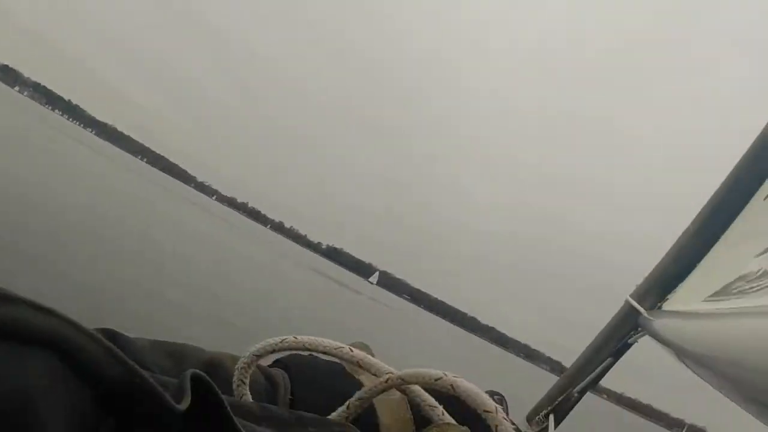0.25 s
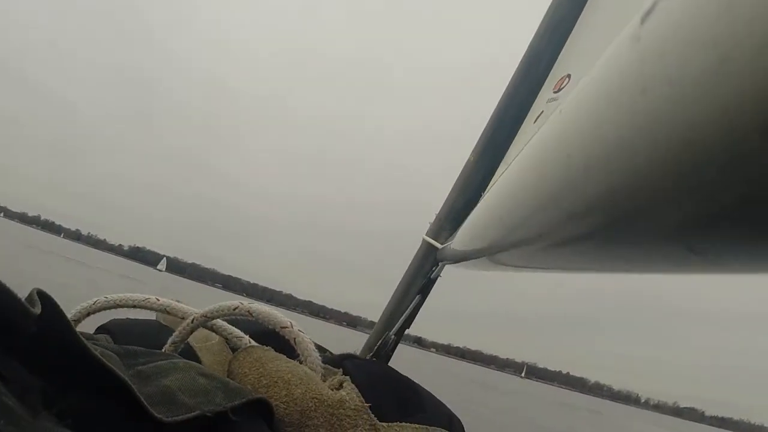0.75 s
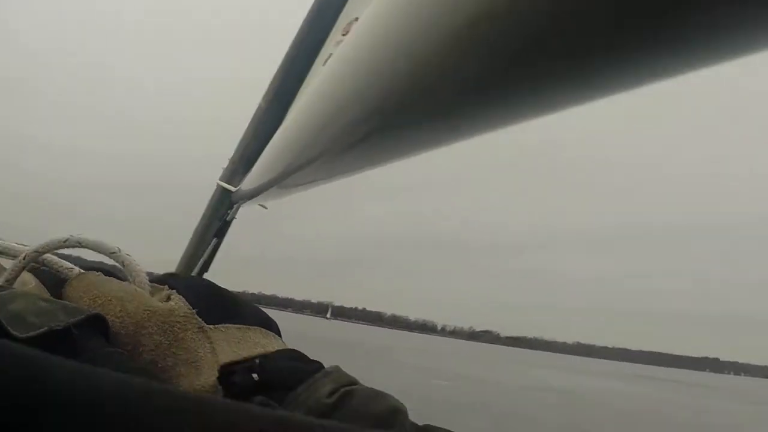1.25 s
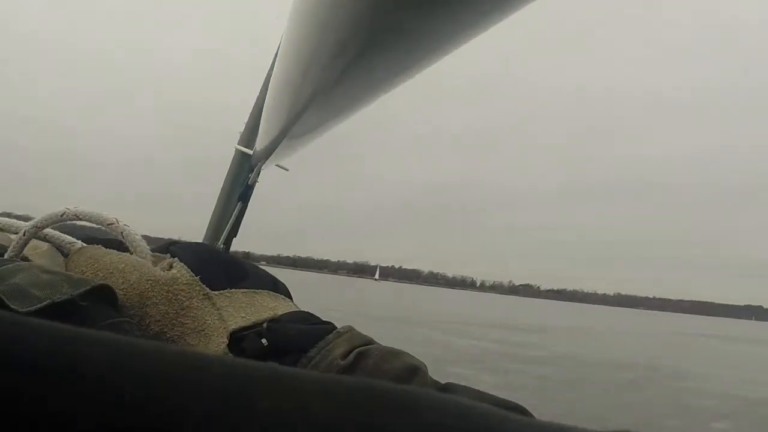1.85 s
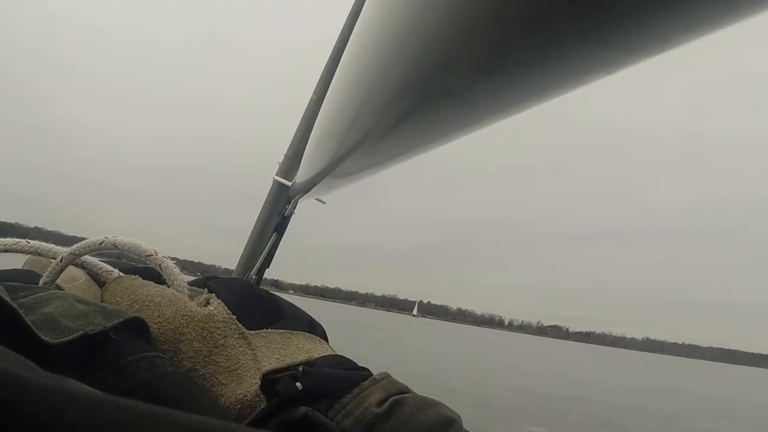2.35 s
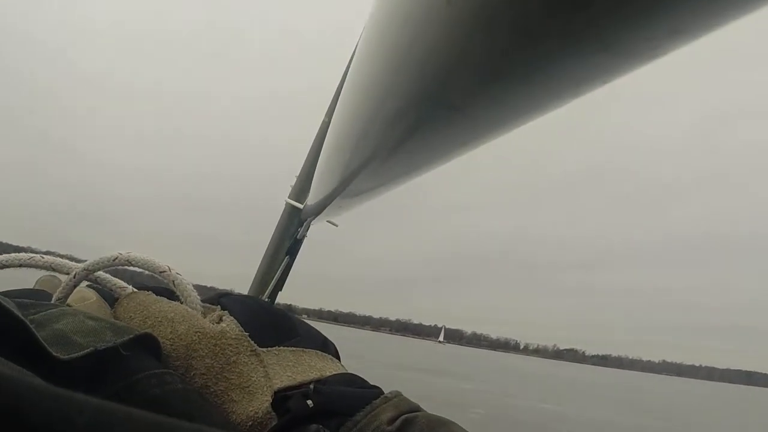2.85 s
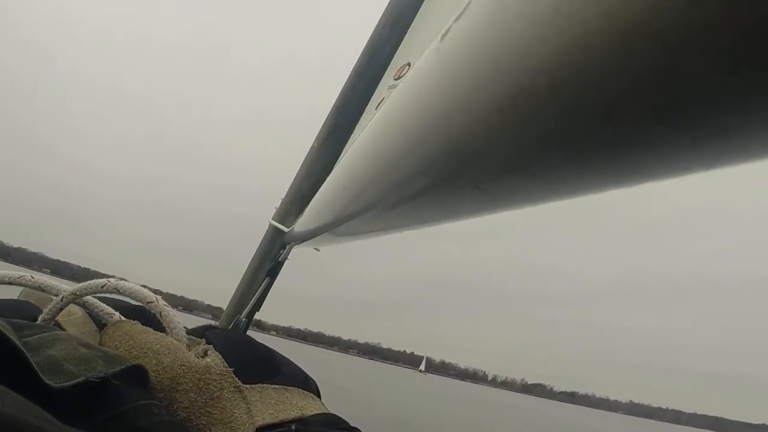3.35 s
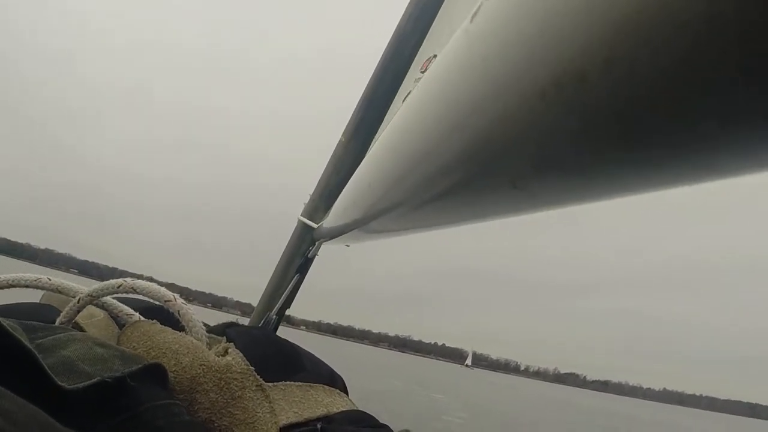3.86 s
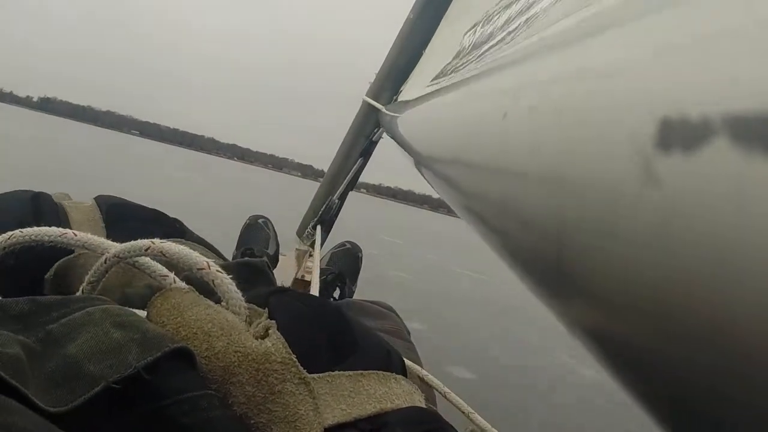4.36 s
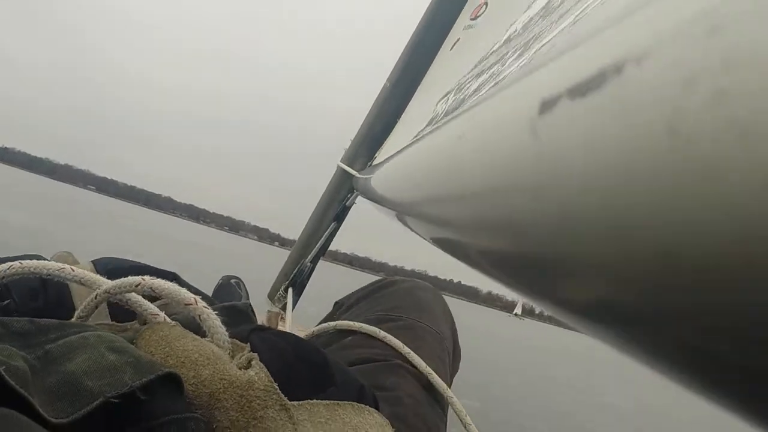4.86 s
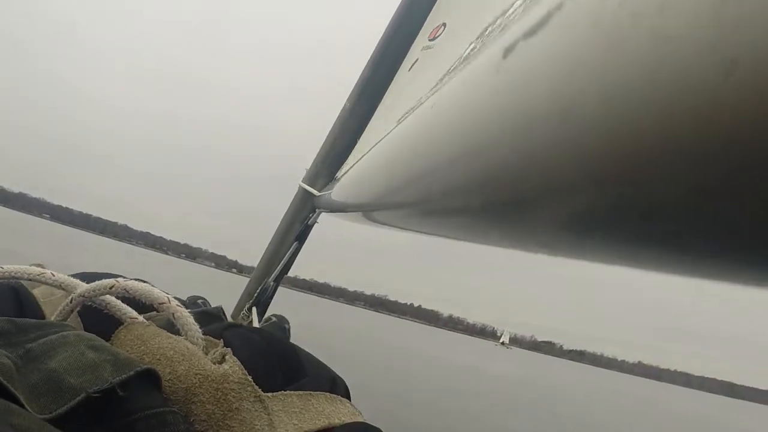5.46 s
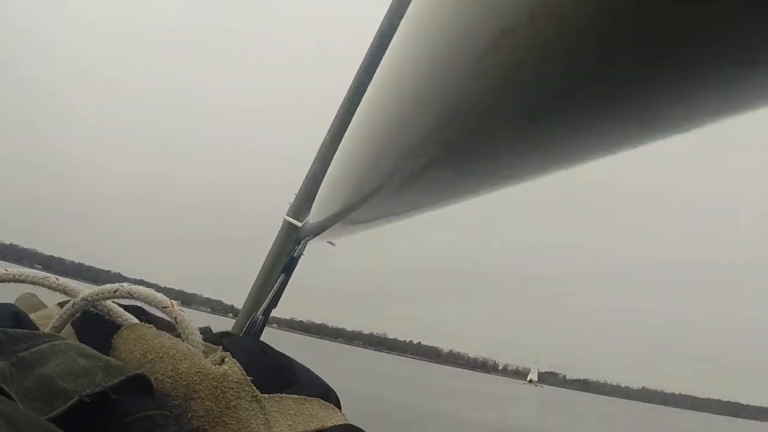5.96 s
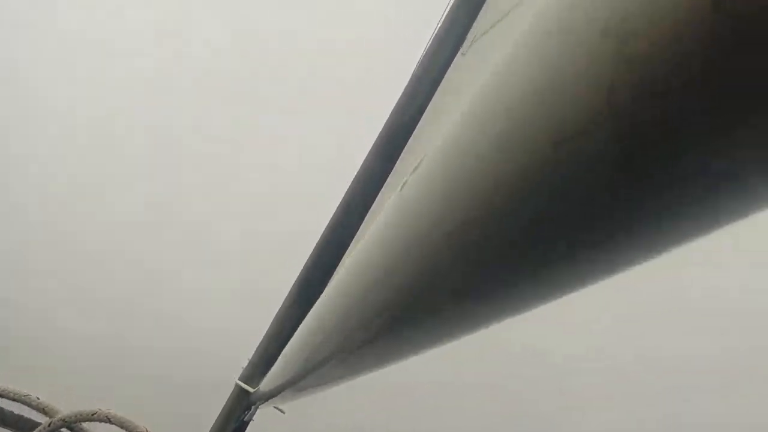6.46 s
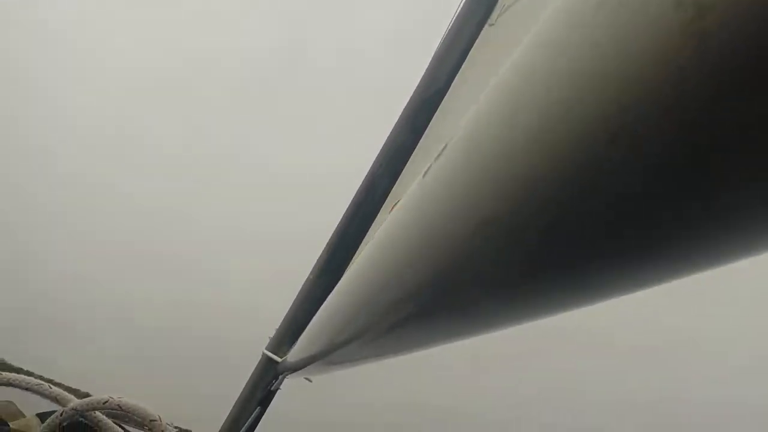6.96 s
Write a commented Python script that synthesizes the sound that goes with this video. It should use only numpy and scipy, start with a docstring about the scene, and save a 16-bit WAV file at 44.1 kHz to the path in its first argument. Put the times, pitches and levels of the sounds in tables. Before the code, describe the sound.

Steel blades rush across rough lake ice with low wind thumping, sharp little cracks, sideways scrapes and a few loud, clattering microphone bumps.

```python
"""On a frozen lake, in an iceboat's cockpit: the ride is heard at the microphone of a helmet camera.
Eddies buffet the microphone (filtered noise); steel runners hiss and the hull rumbles (filtered random grains).
Skids scrape (dense grains through blade resonances); cracks crunch, ping and rattle (noise bursts, damped sines).
The helmet knocks and rubs on the boat (damped modes, noise bursts, stick-slip grains).
A gain control ducks the whole mix at loud peaks and lets it swell back slowly."""
import sys
import numpy as np
from scipy import signal
from scipy.fft import rfft, irfft
from scipy.io import wavfile
from scipy.ndimage import uniform_filter1d, map_coordinates

SR = 44100
rng = np.random.default_rng(int(sys.argv[2]) if len(sys.argv) > 2 else 0)


def generate_wav(signal):
    """Clip the signal to [-1, 1] and save it as 16-bit WAV at the path in sys.argv[1]."""
    frames = np.transpose(np.atleast_2d(signal))
    scaled = np.clip(frames, -1, 1) * 32767
    pcm = np.round(scaled).astype(np.int16)
    wavfile.write(sys.argv[1], SR, pcm)


N = 317520
TIME = np.arange(N) / SR  # s

# blows on the helmet: [t/s, thud f/Hz, thud relative level/dB, clack relative level/dB,
# snap relative level/dB, snap f/Hz]
KNOCKS = [(1.9242,99,0,11,0.5,2740), (1.97,88,-4.5,-12,-40,2000), (1.993,90,-3,-19,-36,2100),
          (2.0258,97,-6.5,2,-33,1700), (3.0255,318,-5.5,2.5,-12.5,1700), (3.038,44,-4.5,-13.5,-38,1800),
          (4.122,156,9,-2,-6.5,6250), (4.127,272,9.5,-22,-5.5,4100), (4.216,217,4.5,-22.5,-16.5,6500),
          (4.272,130,-50,-20.5,-23,2500), (4.41,147,2.5,-2,-16,4200), (4.454,131,-28,-14,-24.5,10700),
          (4.493,131,-21,-11,-28,10500), (4.537,48,-3.5,-25,-30,3000), (5.0775,373,11,-12,-12,2900),
          (5.084,114,0,-19,-29,2900), (5.137,408,12,-4.5,-7,2830)]
# resonances of the hull: [f/Hz, width/Hz, lift/dB]
HULL = [(139, 30, 11.5), (273.3, 53, 8.5), (517, 204, 10.5), (789, 65, 9.5)]
# resonances of the runner steel: [f/Hz, width/Hz, lift/dB; negative is a dip]
STEEL = [(1126, 140, 12.5), (2354, 1180, 7), (2760, 76, -12.5), (3050, 120, 0.5), (3370, 91, 7),
         (4064, 240, 6.9), (5150, 830, 8.5), (6330, 200, 7.5), (7230, 610, 9), (9420, 2000, 9.5)]


def from_db(db):
    """Level to amplitude: 20 dB is a factor of ten."""
    return 10 ** (np.asarray(db) / 20)


def rms_one(x):
    """Normalisation to unit root mean square."""
    return x / np.sqrt(np.mean(x ** 2) + 1e-20)


def drift(rate):
    """Band-limited random modulation: a smooth curve through `rate` random knots a second; rms 1."""
    knots = rng.standard_normal(N // 10)
    used = knots[:int(TIME[-1] * rate) + 4]
    return rms_one(map_coordinates(used, [TIME * rate], order=2, mode="nearest"))


def colour(x, spectrum, resonances=(), size=16384):
    """Minimum-phase filtering of unit power gain: a broad spectrum lifted by resonances."""
    hz = np.maximum(np.fft.rfftfreq(size, 1 / SR), 1)
    points, levels = np.transpose(spectrum)
    db = np.interp(np.log(hz), np.log(points), levels)
    octaves_outside = np.abs(np.log2(hz / np.clip(hz, points[0], points[-1])))
    db = db - 20 * octaves_outside  # steep fall beyond both ends
    for centre, width, lift in resonances:
        db = db + lift / (1 + (2 * (hz - centre) / width) ** 2)
    cepstrum = irfft(np.log(from_db(db)))
    causal_log_spectrum = rfft(2 * cepstrum[:size // 2], size) - cepstrum[0]  # folded: minimum phase
    response = irfft(np.exp(causal_log_spectrum))
    return signal.fftconvolve(x, response / np.linalg.norm(response))[:N]


def grains(per_s, spread_db):
    """Shot noise: randomly timed clicks of uneven size and sign; rms 1."""
    sizes = from_db(spread_db * np.minimum(rng.exponential(1, N), 4))
    happens = rng.random(N) < per_s / SR
    return rms_one(happens * sizes * rng.standard_normal(N))


def fade(impulses, t60):
    """Exponential decay: each impulse jumps up and falls 60 dB in t60 seconds."""
    return signal.lfilter([1], [1, -from_db(-60 / (t60 * SR))], impulses + 1e-18)


def strikes(times, db):
    """Impulsive excitation: one impulse at each time."""
    out = np.zeros(N)
    out[np.round(np.asarray(times) * SR).astype(int)] = from_db(db)
    return out


def ring(clicks, hz, t60):
    """Damped oscillator: each click starts a sine that falls 60 dB in t60 seconds."""
    radius = from_db(-60 / (t60 * SR))
    angle = 2 * np.pi * hz / SR
    feedback = [1, -2 * radius * np.cos(angle), radius * radius]
    return signal.lfilter([0, np.sin(angle)], feedback, clicks + 1e-18)


def gust_lift():
    """Slow modulation of the air flow: decibels above the breeze, each gust one smooth hump."""
    # gusts: [peak t/s, length t/s, lift/dB]
    gusts = [(0.203,1,1), (0.773,0.36,8), (1.497,0.73,8.5), (1.812,0.36,9.5), (5.906,0.38,8), (6.7,2.1,3)]
    lift_db = np.zeros(N)
    for peak, length, lift in gusts:
        phase = np.pi * np.clip((TIME - peak) / length, -.5, .5)
        lift_db += lift * np.cos(phase) ** 2
    return lift_db


def wind(breeze_db=-23.5, lumpy_db=1.5):
    """Buffeting noise: eddies off the helmet thump on the microphone port; the sound is strongest near 38 Hz."""
    # spectrum of the buffeting: [f/Hz, relative level/dB]
    buffet = [(12,-16), (24,-6.5), (38,-1.5), (55,-6.5), (80,-16), (110,-25), (250,-37)]
    eddies = colour(rng.standard_normal(N), buffet, [(38, 12, 7)])
    eddies = eddies / np.sqrt(uniform_filter1d(eddies ** 2, size=5000) + 1e-9)  # even in strength
    return eddies * from_db(breeze_db + gust_lift() + lumpy_db * drift(rate=23))


def runners(hiss_db=-38, rumble_db=-30, hiss_patchy_db=1.9, rumble_patchy_db=2.5):
    """Random excitation: crushed grit hisses under the steel, and the same uneven ice shakes the hull."""
    # slow level of hiss and rumble along the run: [t/s, level/dB]
    slow_level = [(0,1), (.6,1), (1.85,1), (2.25,-0.5), (2.6,-1.5), (3.9,0), (5,3), (5.8,3), (6.2,-1.5),
                  (7.2,1)]
    # spectrum of crushed grit: [f/Hz, relative level/dB]
    hiss = [(500, -14), (900, -13.5), (1500, -5), (2000, -6.5), (3000, -9), (4500, -17.5), (7000, -18.5),
            (8200, -27.5), (11000, -28), (13000, -27.8), (15000, -36)]
    # spectrum of the shaken hull: [f/Hz, relative level/dB]
    rumble = [(55, -14.5), (100, -0.5), (200, 0.5), (400, -8), (640, -15.5), (920, -15.5), (1500, -54.5)]
    gust_load = 0.29  # share of a gust's lift in dB that the sail passes into the rumble
    run_db = np.interp(TIME, *np.transpose(slow_level))
    surface = drift(rate=45)
    grit_db = hiss_db + run_db + hiss_patchy_db * surface
    jolts_db = rumble_db + run_db + gust_load * gust_lift() + rumble_patchy_db * surface
    grit = grains(per_s=16000, spread_db=2.0) * from_db(grit_db)
    jolts = grains(per_s=4000, spread_db=1.5) * from_db(jolts_db)
    return colour(grit, hiss, STEEL) + colour(jolts, rumble, HULL)


def skid(attack_s=0.079, release_s=0.047, flutter_db=2.0, waver_s=0.00024):
    """Cutting excitation: a runner edge slipping sideways bites the ice densely and rings the blade."""
    # sideways slips: [start t/s, end t/s, starting level/dB, easing by the end/dB; negative bites harder]
    skids = [(0,.41,-21,5.5), (1.416,1.486,-39,-8), (1.753,1.877,-28,5), (6.246,6.584,-39.5,-6.5),
             (6.693,7.2,-35.5,-1)]
    # spectrum of the scraping: [f/Hz, relative level/dB]
    scraping = [(600, -31.5), (900, -4), (1080, 3), (1400, 5), (1700, -3.5), (2400, 0), (2900, -11),
                (4200, -20.5), (7000, -28), (8000, -24), (14000, -64)]
    # resonances of the skidding edge: [f/Hz, width/Hz, lift/dB]
    edge = [(1163, 120, 7), (3335, 460, 20), (5140, 870, 9.5), (6490, 1170, 18.6)]
    slip = np.zeros(N)
    for start, end, level_db, easing_db in skids:
        contact = np.interp(TIME, [start - attack_s, start, end, end + release_s], [0, 1, 1, 0])
        slip += contact * from_db(level_db - np.interp(TIME, [start, end], [0, easing_db]))
    bites = grains(per_s=20000, spread_db=2.5) * from_db(flutter_db * drift(rate=70))
    scrape = colour(bites * slip, scraping, edge)
    return np.interp(TIME + waver_s * drift(rate=30), TIME, scrape)  # the ring wavers in pitch


def cracks(crack_db=1.5, crunch_t60=0.024, rattle_db=-17, rattle_t60=0.07, ping_db=0.5):
    """Impact excitation: each crack or small flaw gives a crunch, a ping of the blade and a rattle."""
    # a runner crosses a large crack or ridge: [t/s, relative level/dB]
    crossings = [(0.46,-22), (.525,-26.5), (0.625,-23), (0.639,-19.5), (.718,-23), (0.893,-35), (.985,-20),
                 (1.033,-21.5), (1.134,-26), (1.154,-18), (1.64,-19), (2.095,-16), (2.305,-22), (2.501,-21),
                 (2.784,-25.5), (3.266,-20), (3.659,-25), (3.878,-26.5), (4.983,-16.5), (5.41,-17),
                 (6.117,-19.5), (6.247,-24), (6.276,-27), (6.431,-20), (6.564,-19), (6.634,-20)]
    # spectrum of crunch and rattle: [f/Hz, relative level/dB]
    crack_colour = [(80, 11), (300, -3), (700, 1.5), (1100, -10.5), (2000, 3), (3400, -6), (5000, -15),
                    (7500, -25), (14000, -36)]
    # modes of a pinging runner blade: [f/Hz, relative level/dB, t60/s]
    blade = [(1666,-5,0.041), (2280,-4.5,0.014), (3483,-7.5,0.019), (5250,-13.5,0.0035)]
    flaws_per_s, flaw_db, flaw_spread_db = 24, -27.5, 0.5  # small flaws, met at random
    flaw_sizes = from_db(flaw_db + flaw_spread_db * np.clip(rng.standard_normal(N), -2, 2))
    flaws = (rng.random(N) < flaws_per_s / SR) * flaw_sizes
    hits = strikes(*np.transpose(crossings)) + flaws
    envelope = fade(hits, crunch_t60) + from_db(rattle_db) * fade(hits, rattle_t60)
    noise = from_db(crack_db) * envelope * rng.standard_normal(N)
    out = colour(noise, crack_colour, [*HULL, *STEEL])
    for k, (hz, mode_db, t60) in enumerate(blade):
        spot_db = 2 * rng.standard_normal(N)  # every crack meets the blade at another spot
        out += (-1) ** k * ring(hits * from_db(ping_db + mode_db + spot_db), hz, t60)
    return out


def rubs(judder_db=-1.5, edge_s=0.0079, scratch_db=-5.5, easing_db=-1.0, catching_db=5.5):
    """Stick-slip friction: the dragging helmet booms in its shell under a band of scratching and fine hiss."""
    # drags around the blows: [start t/s, end t/s, judder relative level/dB, scratch relative level/dB,
    # scratch f/Hz, fine hiss relative level/dB]
    drags = [(1.934,1.954,-4,-16,2210,-50), (1.974,2.008,-18,-15,2120,-50), (2.025,2.062,-3.5,-13,2200,-47),
             (4.129,4.207,-4,-17.5,5040,-23), (4.212,4.252,-3,-11,3040,-18), (4.4,4.554,-1.5,-23,5800,-37),
             (5.067,5.125,-6,-20,2300,-50), (5.126,5.226,-3,-16,700,-50)]
    # spectrum of the sticking and slipping: [f/Hz, relative level/dB]
    judder_colour = [(25,-13), (70,-1.5), (130,1), (200,-2.5), (320,-2), (470,-17.5), (800,-24),
                     (2000,-30.5)]
    # spectrum of the scratching: [f/Hz, relative level/dB]
    friction_colour = [(400,-3), (1000,-7.5), (2300,7), (3500,4.5), (6000,-3), (8000,-23.5), (14000,-30)]
    fine_band_hz = [5700, 11400]
    judder, scratch, fine = np.zeros((3, N))
    friction = rng.standard_normal(N) * from_db(scratch_db + catching_db * drift(rate=110))
    for start, end, drag_db, rasp_db, hz, hiss_db in drags:
        contact = np.clip(np.minimum(TIME - start, end - TIME) / edge_s, 0, 1)
        contact = contact * from_db(np.interp(TIME, [start, end], [0, easing_db]))  # pressure eases off
        judder += contact * from_db(drag_db + judder_db)
        fine += contact * from_db(hiss_db)
        band = colour(contact * from_db(rasp_db) * friction, friction_colour, [(hz, hz / 4, 9)])
        scratch += signal.sosfilt(signal.butter(1, 1.3 * hz, fs=SR, output="sos"), band)
    fine_filter = signal.butter(2, fine_band_hz, "band", fs=SR, output="sos")
    fine = signal.sosfilt(fine_filter, fine * friction)
    slips = judder * grains(per_s=1500, spread_db=1.5)
    return scratch + fine + colour(slips, judder_colour, [(139.6, 7.9, 10)])


def case_buzz(buzz_db=8.0, buzz_t60=0.021):
    """Contact rattle: the camera's plastic case buzzes briefly in its mount, a decaying band of noise."""
    times, _, _, clack_db = np.transpose(KNOCKS)[:4]
    buzz = fade(strikes(times, clack_db + buzz_db), buzz_t60) * rng.standard_normal(N)
    return signal.sosfilt(signal.butter(3, [600, 2900], "band", fs=SR, output="sos"), buzz)


def case_snap(snap_db=13.5, snap_t60=0.0091, snap_width=1.42):
    """Contact transient: the case snaps at each blow, a noise burst around that blow's own pitch."""
    out = np.zeros(N)
    noise = rng.standard_normal(N)
    for s, _, _, _, level_db, hz in KNOCKS:
        low, high = hz / snap_width, min(hz * snap_width, .45 * SR)
        band_gain = np.sqrt(SR / 2 / (high - low))  # equal power whatever the bandwidth
        burst = fade(strikes([s], level_db + snap_db), snap_t60) * noise * band_gain
        out += signal.sosfilt(signal.butter(2, [low, high], "band", fs=SR, output="sos"), burst)
    return out


def thumps(thump_db=4.5, cycles=8.1):
    """Damped oscillation: each blow shoves the camera, which swings and falls 60 dB in a few cycles."""
    return sum(ring(strikes([s], thud_db + thump_db), hz, cycles / hz) for s, hz, thud_db, *_ in KNOCKS)


def knocks(knock_db=6.5, below_db_per_octave=6.5, treble_db=-5):
    """Modal synthesis: every blow rings the helmet's modes, weighted by the spectrum of its contact."""
    # modes of helmet and camera case: [f/Hz, relative level/dB, t60/s]
    helmet_modes = [(97.5,-7.5,0.17), (134.8,-9,0.35), (316,-7,0.063), (361,-7,0.033), (509,-5.5,0.026),
                    (685,-7,0.024), (800,0,0.018), (1044,-10,0.045), (1570,4.5,0.0077), (1540,-35,0.31),
                    (1960,-2,0.014), (2300,3,0.012), (2780,-3.5,0.011), (3180,-12,0.022), (4960,5,0.009),
                    (6260,2,0.0097), (8700,-19,0.0034), (11600,3,0.0016)]
    times, thud_hz = np.transpose(KNOCKS)[:2]
    chance_db = rng.standard_normal((len(times), len(helmet_modes)))
    out = np.zeros(N)
    for k, (hz, mode_db, t60) in enumerate(helmet_modes):
        blow_db = []
        for _, pitch, thud_db, clack_db, snap_db, _ in KNOCKS:
            points = np.log([pitch, 1300, 2400, 4800])
            levels = [thud_db, clack_db, clack_db, snap_db + treble_db]
            blow_db.append(np.interp(np.log(hz), points, levels))
        # a short contact moves the lowest modes little
        blow_db = np.array(blow_db) - below_db_per_octave * np.maximum(np.log2(thud_hz / hz), 0)
        sign = 1 if hz < 600 else (-1) ** k
        out += sign * ring(strikes(times, blow_db + mode_db + knock_db + chance_db[:, k]), hz, t60)
    return out


def scene():
    """Superposition of direct sound: all sources are close, with no echo on the open lake."""
    ride = wind() + runners() + skid() + cracks()
    helmet = rubs() + case_buzz() + case_snap() + thumps() + knocks()
    return (ride + helmet)[None]


def gain_control(x, threshold_db=-9.0, deepest_db=20.0, release_db_per_s=17, ahead_s=0.014):
    """Dynamic range limiting: looks a little ahead, ducks fast under a loud peak and recovers slowly."""
    level_db = 10 * np.log10(np.maximum(uniform_filter1d(x ** 2, size=130), 1e-12))
    over_db = np.clip(level_db - threshold_db, 0, deepest_db)
    recovery_db = release_db_per_s * TIME
    held_db = np.maximum.accumulate(over_db + recovery_db) - recovery_db
    early_db = np.interp(TIME + ahead_s, TIME, held_db)
    return x * from_db(-uniform_filter1d(early_db, size=220))


def record(dry):
    """Saturation and band-limiting: gain control, clipping of what still overloads, a steep top cut."""
    cutoff_hz = 15100
    clipped = np.clip(gain_control(dry[0]), -1, 1)
    return signal.sosfilt(signal.ellip(10, .1, 80, cutoff_hz, fs=SR, output="sos"), clipped)[None]


dry = scene()
out = record(dry)
generate_wav(out)
```